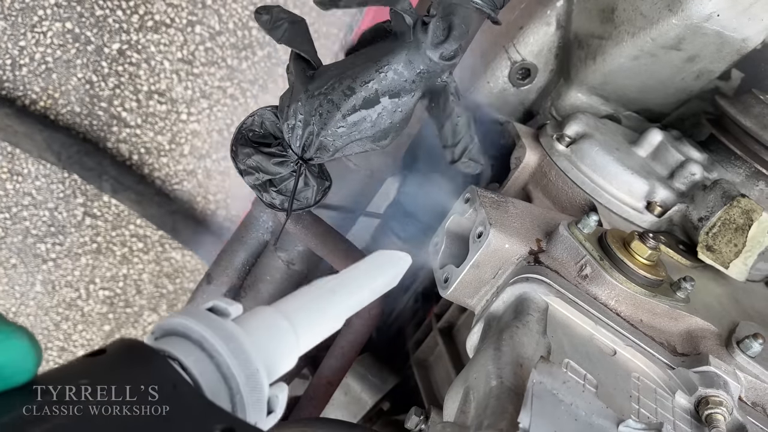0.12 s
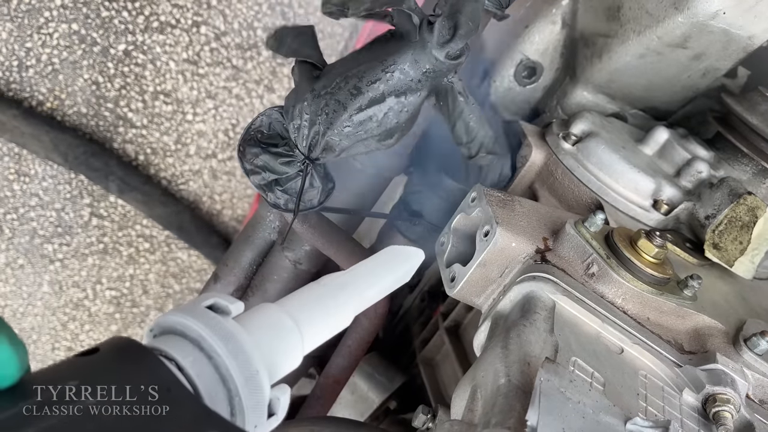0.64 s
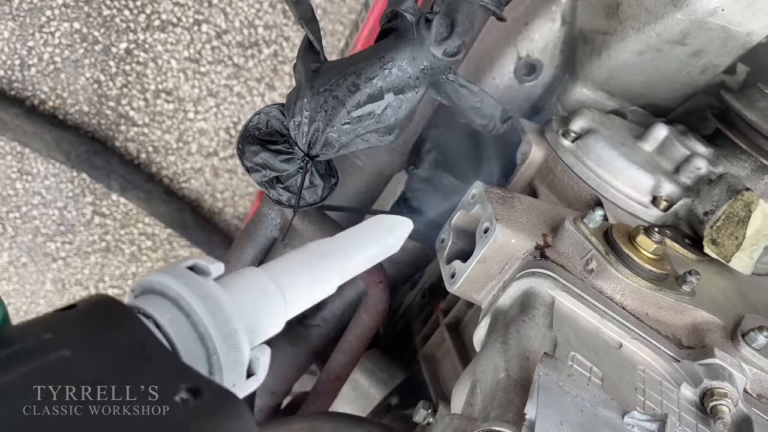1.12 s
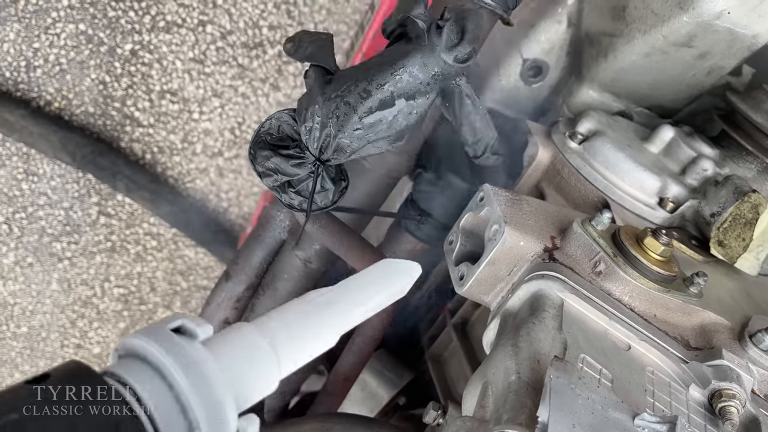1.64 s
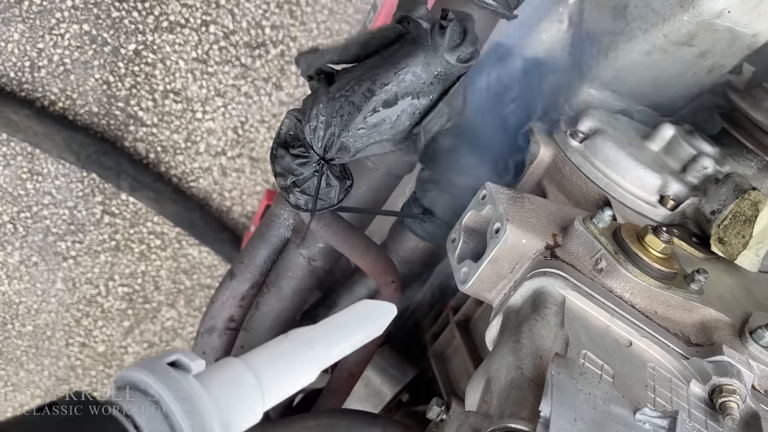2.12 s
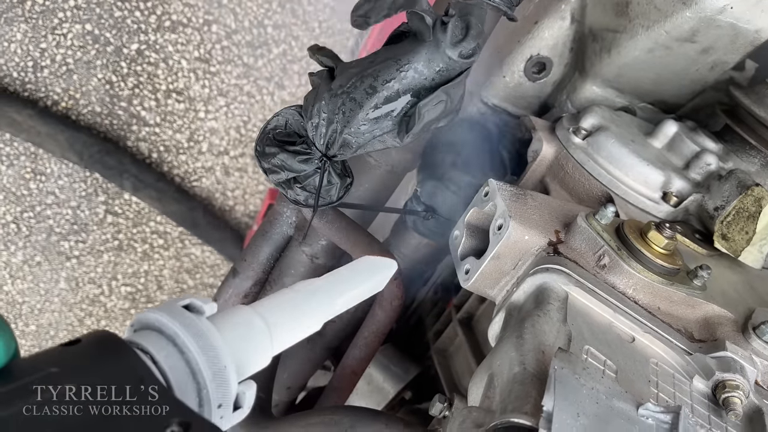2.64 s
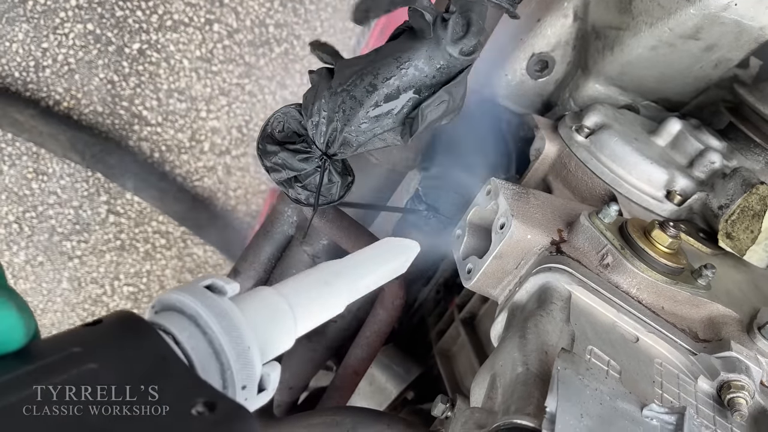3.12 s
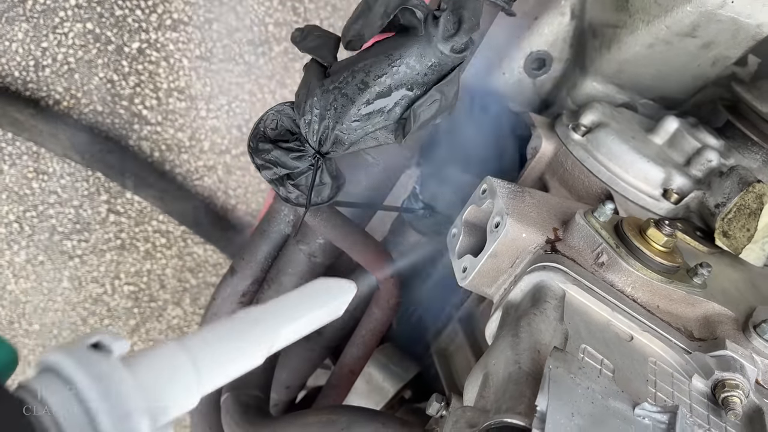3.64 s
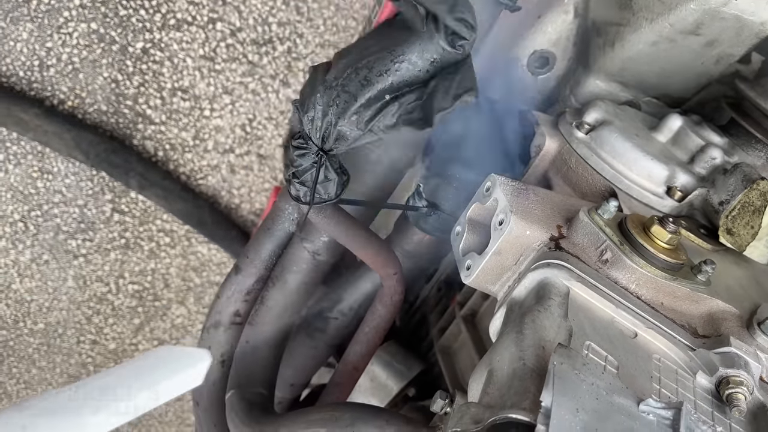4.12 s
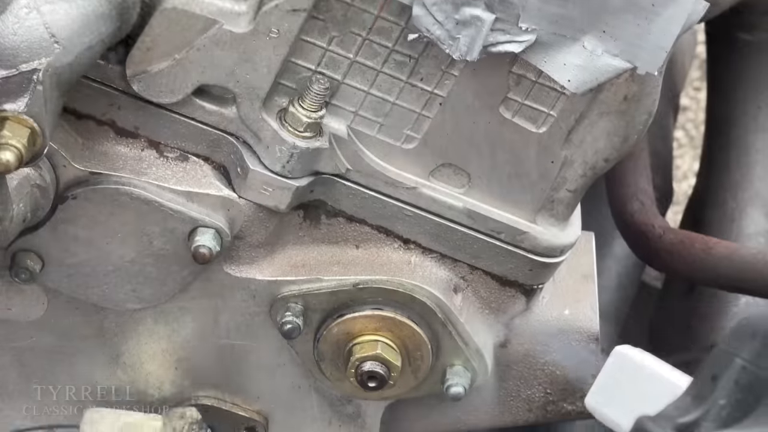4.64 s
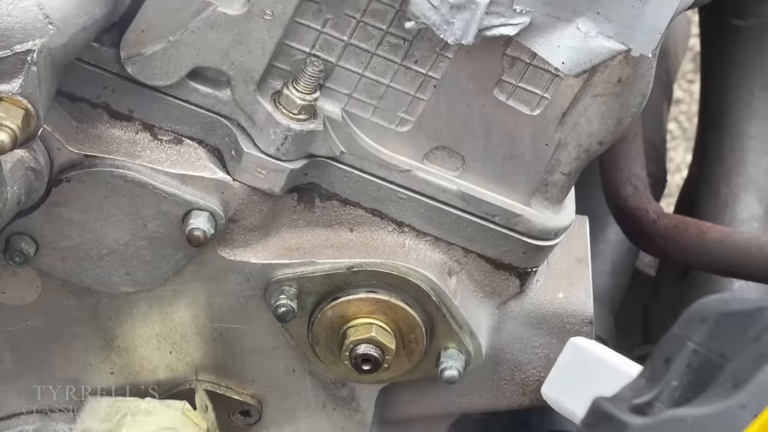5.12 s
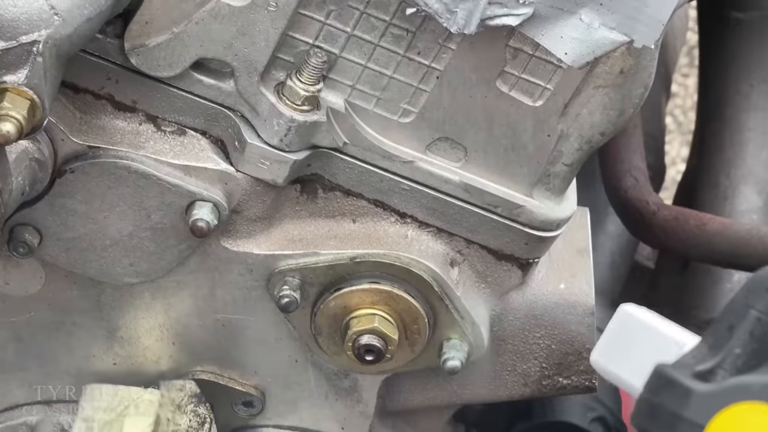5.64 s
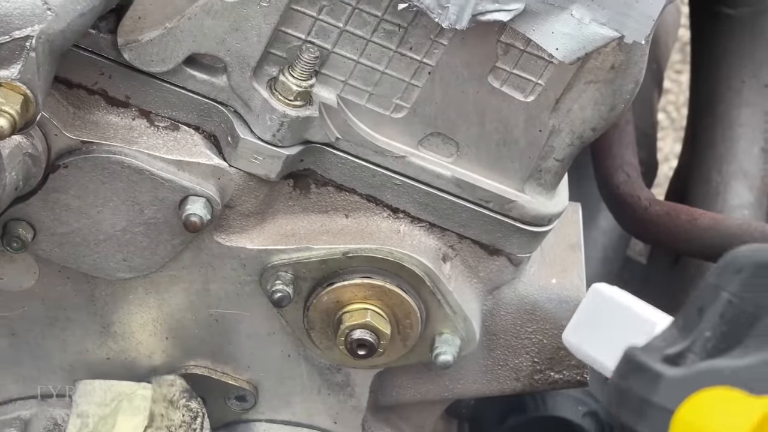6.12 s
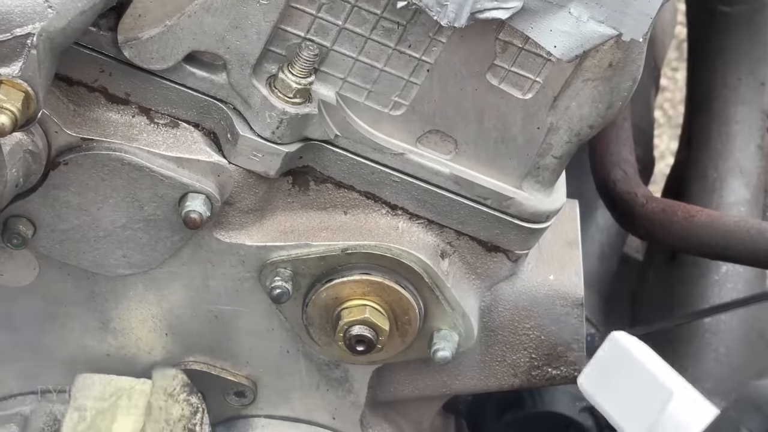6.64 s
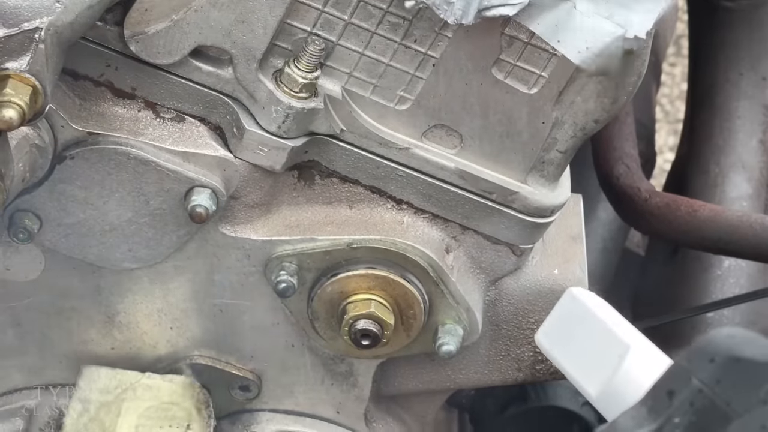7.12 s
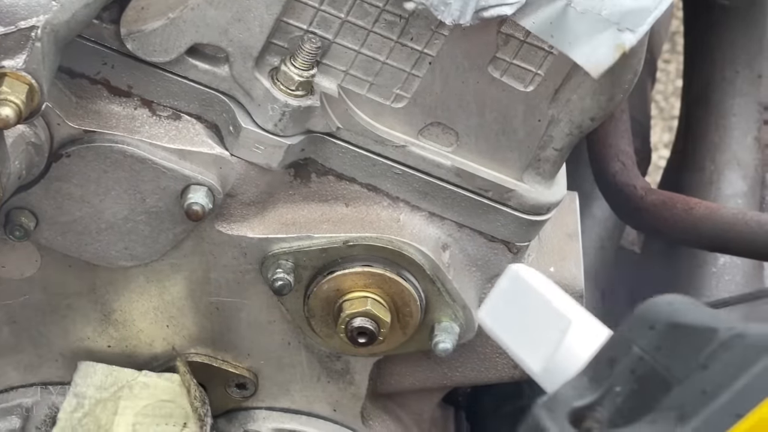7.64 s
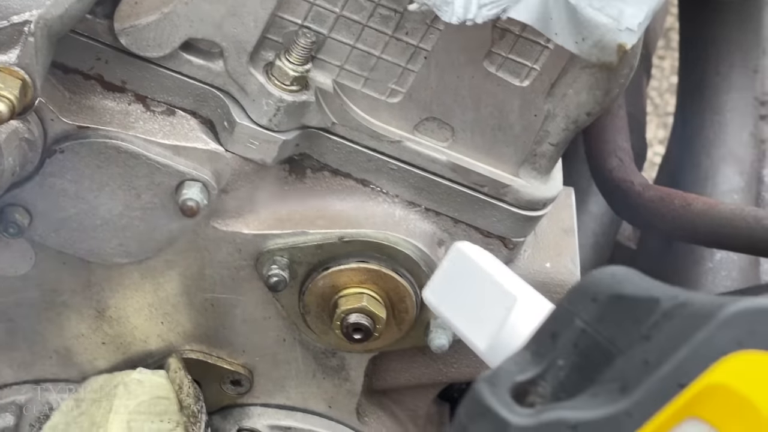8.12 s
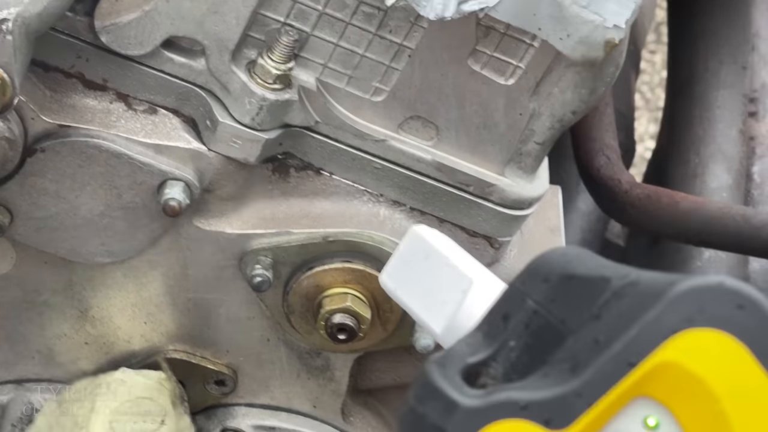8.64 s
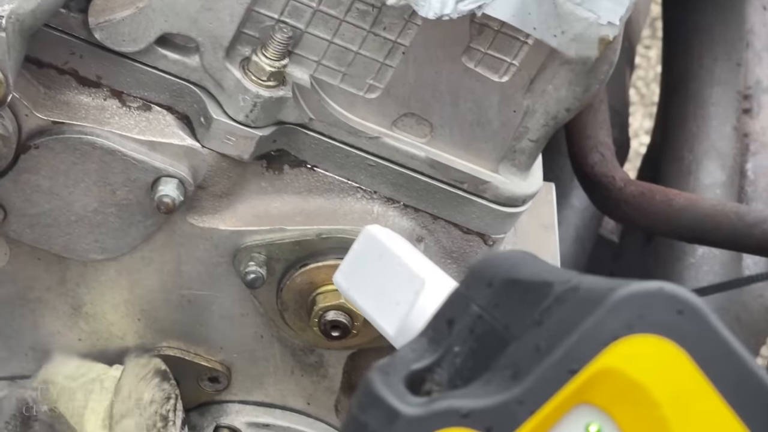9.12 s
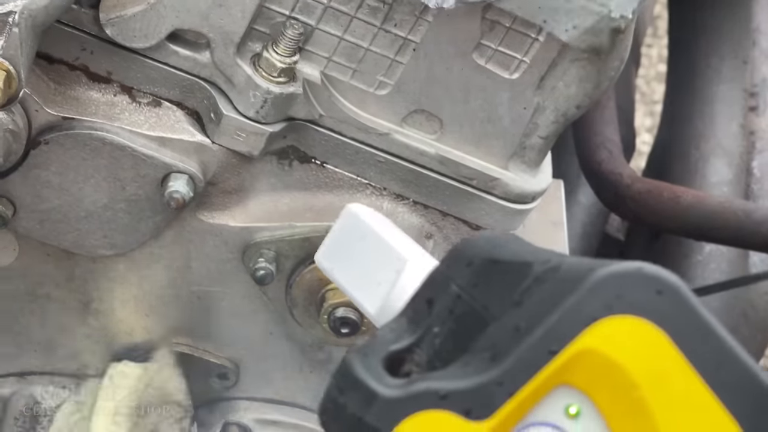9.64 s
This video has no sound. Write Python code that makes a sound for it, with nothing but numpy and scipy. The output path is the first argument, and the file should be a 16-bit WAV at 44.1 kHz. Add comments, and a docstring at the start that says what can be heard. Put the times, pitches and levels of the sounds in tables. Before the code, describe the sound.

A dry ice blaster's fierce, bright air hiss sweeps across an engine outdoors, roaring in recesses and whistling at edges, then steadies with a breathy howl late.

```python
"""Dry ice blaster on an engine, two positions

Outdoors, compressed air drives pellets at an engine; a side-on position fades into a head-on one.
The jet is patchy broadband noise, and the spray on metal is the same kind through treble resonances.
Side-on, the sweeping jet makes recesses roar (broad resonances) and edges and bolt holes whistle.
Hollows howl as noise in resonances; a strong, noisy howl near 5.8 kHz enters near the end.
Two close microphone ports differ in level and phase; a limiter steadies the blast."""
import sys
import numpy as np
from scipy import signal
from scipy.fft import rfft, irfft, next_fast_len
from scipy.io import wavfile
from scipy.ndimage import uniform_filter1d, map_coordinates

SR = 44100
rng = np.random.default_rng(int(sys.argv[2]) if len(sys.argv) > 2 else 0)


def voltage_ratio(level):
    """Linear amplitude factor for a level in decibels (scalar or array-like)."""
    return 10 ** (np.asarray(level, float) / 20)


def transcribe(u):
    """Save the signal u as a 16-bit wav file named by the first command-line argument.

    u: samples, shape (n,) or (channels, n), limited to [-1, 1]; the rate is SR.
    q: integer samples, one column per channel.
    """
    v = np.clip(np.atleast_2d(u).T, -1, 1)
    q = np.round(v * 32767).astype(np.int16)
    wavfile.write(sys.argv[1], SR, q)


N = 430408

# The jet's spectrum and stereo image at each position:
# (frequency [Hz], relative level [dB], left-right [dB], likeness of the ports [0-1], left lead [rad])
JET_SIDE_ON = [(24.4, -28, 0, .5, 0), (53.5, -13, 0, 0.1, 0.17), (300, -12.5, 0, 0.6, -0.35),
               (836, -13.5, 0.5, 0.1, -0.69), (1500, -12, -2, 0.84, -1.06), (2100, -14, -4.5, 0.62, -0.58),
               (3430, -9.5, -2.5, 0.38, -0.94), (4520, -9.5, -5, 0.8, -0.52), (5100, -6.5, -9, 0.4, -0.62),
               (6500, -5, -2.5, 0.8, -0.65), (7400, -2.5, -5, 0.66, -1.37), (9050, -2.5, 1, .99, 0.62),
               (9740, -6.5, -1, 1, 0.19), (12000, -19, 0.5, 1, 0.32), (15000, -28, 0, .95, 0.78),
               (17200, -24, -6, .95, -0.1)]
JET_HEAD_ON = [(25, -26, 0, .7, 0), (55.4, -14.5, 0, 0.7, 0), (500, -13.5, 1, 0.7, 0.041),
               (1230, -11.5, 0.5, 0.49, 0), (2260, -11.5, 0, 1, 0.15), (3300, -8.5, 0, 0.74, 0.31),
               (4870, -5.5, 0, 0.99, 0.59), (6200, -3, 0, 1, 0.25), (7400, -1, 0, 1, 0),
               (8070, -0.5, 0, 0.95, 0.56), (8600, 1.5, 0, 0.67, 0), (9930, -2, 0, 1, 0),
               (10400, -6.5, 0, 0.98, 0.31), (12270, -17.5, 0, .96, 0.68), (14600, -28.5, 0, .99, 0.65),
               (16500, -16, 0, .995, 0)]
# Broad resonances blown by the jet: recesses, then sprayed metal at each position:
# (centre [Hz], width at -6 dB [Hz], relative level [dB])
RECESS_MODES = [(1550, 820, -1.5), (1940, 1800, 2.5), (3140, 1300, -0.5)]
SPRAY_MODES_SIDE_ON = [(4950, 1100, 3.5), (5600, 2600, -1.5), (6500, 440, 3)]
SPRAY_MODES_HEAD_ON = [(3170, 760, -3), (4690, 1200, 0.5), (5550, 1240, 2), (6400, 250, -2)]
# Crossfade from side-on to head-on: (start [s], end [s])
POSITION_FADE = (4.43, 4.79)
# Sound bending round the housing to one port, its delay before the position scales it:
# (lower edge [Hz], upper edge [Hz], delay [s])
HOUSING_DETOUR = (8750, 15200, .00031)
# Side-on, roar as the sweeping jet enters and leaves recesses: (time [s], level [dB])
ROAR_SWEEP = [(0, -29), (.13, -29), (.2, -34.5), (.5, -35), (.62, -29.5), (.85, -31.5), (.92, -38),
              (1.13, -44.5), (1.36, -35), (1.58, -38), (1.84, -30), (1.92, -38.5), (2.15, -33),
              (2.3, -34.5), (2.55, -41), (2.75, -27.5), (2.95, -30), (3, -30.5), (3.4, -31), (3.48, -34),
              (3.72, -29), (3.95, -27), (4.57, -28), (4.62, -33)]
# Head-on, spray as the jet creeps over rougher and smoother metal: (time [s], level [dB])
SPRAY_CREEP = [(4.75, -28.5), (5.38, -28.5), (5.68, -31.5), (5.91, -29.5), (6.25, -33), (6.76, -29.5),
               (7.4, -30.5), (8.11, -36), (8.46, -31), (9.3, -37.5), (9.55, -29.5), (9.76, -31)]
# Sharp edges and bolt holes whistling in the jet:
# (start [s], end [s], start pitch [Hz], end pitch [Hz], level [dB])
EDGE_WHISTLES = [(-.05, .18, 5640, 6050, -30), (.14, 0.314, 4800, 4980, -26),
                 (0.217, 0.285, 6140, 6050, -30), (.37, 0.572, 4980, 4880, -38),
                 (0.438, .54, 5870, 5960, -29.5), (0.573, .66, 6500, 6500, -32),
                 (.62, 0.862, 4880, 4800, -37), (1.42, 1.603, 5800, 5780, -35),
                 (1.624, 1.78, 5720, 5650, -30), (1.545, 1.78, 4950, 4800, -35),
                 (1.761, 1.862, 6640, 6560, -28), (1.78, 1.87, 5900, 6150, -32),
                 (1.9, 2.134, 1530, 1475, -38.5), (2.802, 2.98, 5930, 6160, -27)]
# Wider hollows howling as the jet crosses them:
# (start [s], end [s], pitch [Hz], half-power width [Hz], level [dB])
HOLLOW_HOWLS = [(0.038, .17, 2800, 300, -34), (0.127, 0.216, 9750, 150, -33), (.56, .85, 2410, 600, -37),
                (.58, .7, 7350, 250, -31), (1.33, 1.4, 5550, 200, -33), (1.351, 1.8, 7500, 250, -33),
                (1.773, 1.86, 2120, 350, -35), (2.238, 2.333, 5520, 150, -33), (2.98, 3.12, 2650, 500, -31),
                (2.979, 3.3, 2230, 330, -29), (3, 3.2, 6530, 250, -32), (3.062, 3.17, 4430, 170, -31),
                (3.204, 3.42, 7300, 200, -33), (3.59, 3.71, 1677, 350, -29.5), (3.93, 4.35, 1993, 200, -35),
                (4.07, 4.223, 1550, 140, -27), (4.234, 4.35, 1550, 150, -23.5),
                (4.381, 4.606, 1527, 140, -27.5), (5, 5.3, 6400, 150, -35), (5.152, 5.45, 5830, 150, -38),
                (5.599, 6.4, 3094, 400, -37.5), (5.747, 6.15, 6500, 150, -36),
                (6.378, 6.552, 8050, 250, -27), (6.35, 7.1, 9000, 700, -33), (6.899, 8, 7700, 250, -33),
                (7.148, 7.75, 5600, 300, -31.5), (8.4, 9.42, 5680, 400, -28.5),
                (9.05, 9.45, 10100, 400, -29), (9.05, 9.45, 9240, 200, -33),
                (9.419, 9.85, 5790, 250, -23.5), (9.498, 9.85, 4570, 220, -32)]


def unit(x):
    """Scales a signal to rms 1."""
    return x / np.sqrt(np.mean(x ** 2) + 1e-20)


def read(rows, at):
    """Joins every column after the first by straight lines and reads it at the given places."""
    first, *columns = np.transpose(rows)
    return [np.interp(at, first, column) for column in columns]


def on_log(table, hz):
    """Reads a table over frequency on a log axis."""
    return read([(np.log(f), *rest) for f, *rest in table], np.log(hz + 1))


def wobble(rate):
    """A smooth random curve through `rate` normal knots a second."""
    knots = rng.standard_normal(int(N * rate / SR) + 4)
    return map_coordinates(knots, [np.arange(N) * rate / SR])


def filtered(x, response):
    """Applies a complex response of frequency [Hz]."""
    size = next_fast_len(N + 8192)
    return irfft(rfft(x, size) * response(np.fft.rfftfreq(size, 1 / SR)), size)[..., :N]


def turbulence(table, patchy_db):
    """Turbulent air as noise in streaky patches, as alike in the two ports as the table says."""
    noise = signal.stft(rng.standard_normal((2, N)), nperseg=512)[2]
    patches = uniform_filter1d(rng.standard_normal(noise.shape[1:]), size=3, axis=0)
    patches = uniform_filter1d(patches, size=30, axis=1)  # streaks along time
    pair = signal.istft(noise * voltage_ratio(patchy_db * unit(patches)), nperseg=512)[1][:, :N]

    def split(hz):
        likeness = np.clip(on_log(table, hz)[2], 0, 1)
        angle = np.arccos(likeness) / 2
        return np.array([np.cos(angle), np.sin(angle)])
    shared, opposed = filtered(pair, split)
    return np.array([shared + opposed, shared - opposed])


def jet(table, level_db):
    """The mixing noise of air and pellets leaving the nozzle, with a flutter in the feed."""
    hiss = unit(filtered(turbulence(table, patchy_db=1.2), lambda hz: voltage_ratio(on_log(table, hz)[0])))
    flutter_db = 0.45 * wobble(4) + 0.3 * wobble(12)
    return voltage_ratio(level_db + flutter_db) * hiss


def blown(modes, table, patchy_db):
    """Turbulence heard through broad resonances with steep skirts, at rms 1."""
    def peaks(hz):
        power = sum(voltage_ratio(db) ** 2 / (1 + ((hz - centre) / (width / 2)) ** 2) ** 2
                    for centre, width, db in modes)
        return np.sqrt(power)
    return unit(filtered(turbulence(table, patchy_db), peaks))


def recess_roar(level_db):
    """Recesses resonate broadly while the jet blows across them."""
    return voltage_ratio(level_db + 1.27 * wobble(12)) * blown(RECESS_MODES, JET_SIDE_ON, patchy_db=2.5)


def metal_spray_side_on(depth_db):
    """Spray on metal as blown treble resonances, gaining a little as the roar rises."""
    level_db = -32 + 0.26 * depth_db + 1.3 * wobble(12)
    return voltage_ratio(level_db) * blown(SPRAY_MODES_SIDE_ON, JET_SIDE_ON, patchy_db=1.9)


def ringing(rows):
    """Noise rings in gliding resonances; the narrow ones lock into a clearer tone."""
    fade_in_s, clear_hz, waver = 0.012, 25, 0.008  # waver: share of the pitch per unit of wobble
    out = np.zeros((2, N))
    for start, end, start_hz, end_hz, width, db, fade_db, pan_db in rows:
        i = np.arange(max(int(start * SR), 0), min(int(end * SR), N))
        t = i / SR
        pole = np.exp(-1.5 * np.pi * width / SR)
        push = [1, 1j] @ rng.standard_normal((2, 2 * SR))[:, :len(i)]
        rough = signal.lfilter([1], np.convolve([1, -pole], [1, -pole]), push)  # two poles: steep skirts
        tone = rough / np.std(rough) + clear_hz / width  # the constant adds a clear tone

        pitch = np.interp(t, [start, end], [start_hz, end_hz]) * (1 + waver * wobble(25)[i])
        phase = 2 * np.pi * np.cumsum(pitch) / SR
        edges = np.clip(np.minimum(t - start, end - t) / fade_in_s, 0, 1)
        swell = edges * voltage_ratio(fade_db * (.5 - (t - start) / (end - start)))
        port_gains = voltage_ratio(db + np.array([[pan_db / 2], [-pan_db / 2]]))
        out[:, i] += port_gains * swell * np.real(tone * np.exp(1j * phase))
    return out


def at_position(rows, side):
    """Keeps the rows that start before the crossfade for side-on, the others for head-on."""
    return [row for row in rows if (row[0] < POSITION_FADE[0]) == side]


def edge_whistles():
    """Edges and bolt holes ring narrowly side-on, fading as the sweeping jet moves on."""
    q, fade_db, pan_db = 77, 1.5, -1  # q: pitch over width; pan: left-right
    return ringing([(start, end, hz0, hz1, hz0 / q, db, fade_db, pan_db)
                    for start, end, hz0, hz1, db in at_position(EDGE_WHISTLES, True)])


def hollow_howls(side):
    """Hollows ring more widely; they sag and fade under the sweeping jet, hold under the creeping one."""
    # sag: share of the pitch lost a second; pan: left-right
    sag_per_s, fade_db, pan_db = (.1, 4, -2.5) if side else (0, 0, 0)
    return ringing([(start, end, hz, hz * (1 - sag_per_s * (end - start)), width, db, fade_db, pan_db)
                    for start, end, hz, width, db in at_position(HOLLOW_HOWLS, side)])


def metal_spray_head_on():
    """Spray on metal as blown treble resonances, its level following the creeping jet."""
    level_db, = read(SPRAY_CREEP, np.arange(N) / SR)
    return voltage_ratio(level_db + 1.16 * wobble(8)) * blown(SPRAY_MODES_HEAD_ON, JET_HEAD_ON, patchy_db=1.7)


def ports(x, table, left_first):
    """Sets level and phase between the ports; left_first scales and signs the detour's phase."""
    low_hz, high_hz, delay_s = HOUSING_DETOUR

    def response(hz):
        _, pan_db, _, lead = on_log(table, hz)
        detour = 2 * np.pi * delay_s * (np.clip(hz, low_hz, high_hz) - low_hz)
        left = voltage_ratio(pan_db / 2) * np.exp(.5j * (lead + left_first * detour))
        return np.array([left, 1 / left])
    return filtered(x, response)


def side_on():
    """The nozzle sweeps over pipes and hollows; the hiss sinks a little as the roar rises."""
    roar_db, = read(ROAR_SWEEP, np.arange(N) / SR)
    depth_db = roar_db - np.mean([db for _, db in ROAR_SWEEP])
    blast = jet(JET_SIDE_ON, -25 - 0.066 * depth_db)  # buried in a recess
    blast = blast + recess_roar(roar_db) + metal_spray_side_on(depth_db)
    return ports(blast + edge_whistles() + hollow_howls(True), JET_SIDE_ON, left_first=0.97)


def head_on():
    """The nozzle creeps along a casting towards a bolt."""
    blast = jet(JET_HEAD_ON, -22.5) + metal_spray_head_on()
    return ports(blast + hollow_howls(False), JET_HEAD_ON, left_first=-1.11)


def scene():
    """One position fades into the other at constant power."""
    turn = np.interp(np.arange(N) / SR, POSITION_FADE, [0, np.pi / 2])
    return np.cos(turn) * side_on() + np.sin(turn) * head_on()


def limited(x):
    """A quick limiter shared by both ports leans on millisecond swells above the slower mean power."""
    power = np.mean(x ** 2, axis=0)
    quick, slow = (np.abs(uniform_filter1d(power, size=n)) + 1e-9 for n in (64, 8820))  # samples
    return x * (.15 + quick / slow) ** -.16


def low_pass(x):
    """Removes everything above the highest recorded frequency."""
    return signal.sosfilt(signal.butter(12, 17100, fs=SR, output="sos"), x)


def record(dry):
    """The limiter steadies the ports, then the band is cut at both ends."""
    def band(hz):
        low_cut = (hz / 48) ** 3 / np.sqrt(1 + (hz / 48) ** 6)
        return (hz < 15790) * low_cut
    return low_pass(filtered(limited(dry), band))


dry = scene()
out = record(dry)
transcribe(out)
```